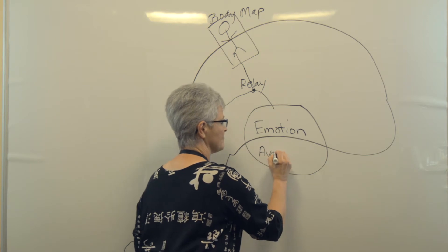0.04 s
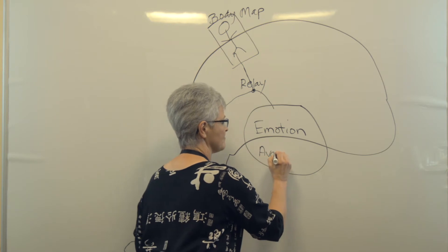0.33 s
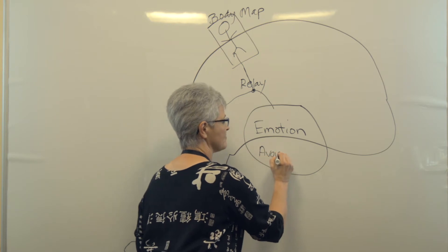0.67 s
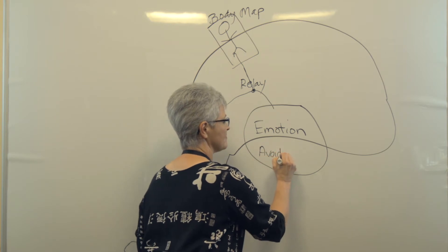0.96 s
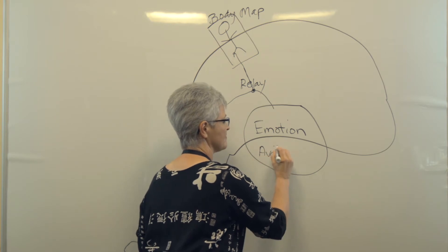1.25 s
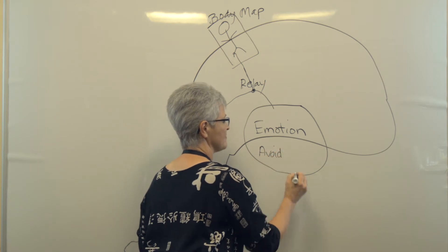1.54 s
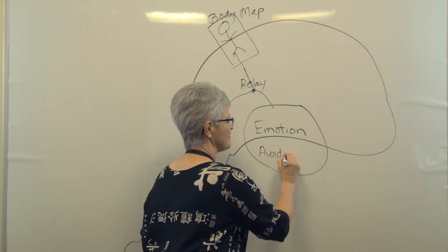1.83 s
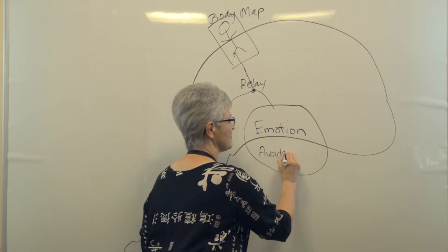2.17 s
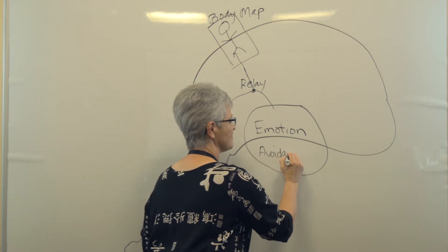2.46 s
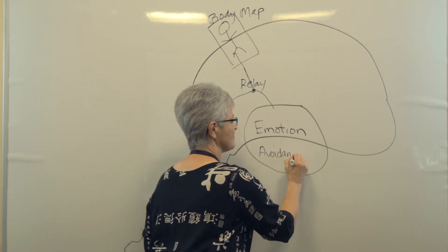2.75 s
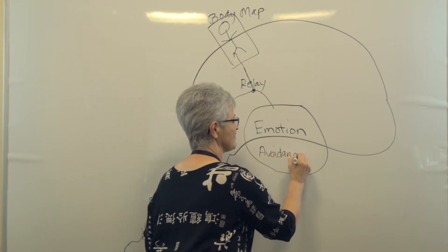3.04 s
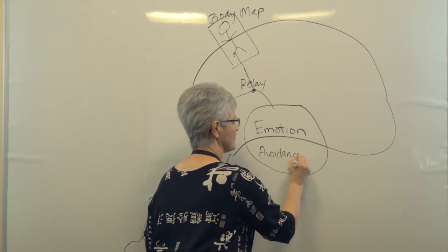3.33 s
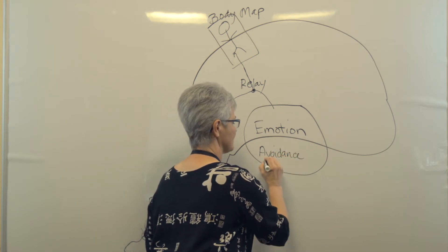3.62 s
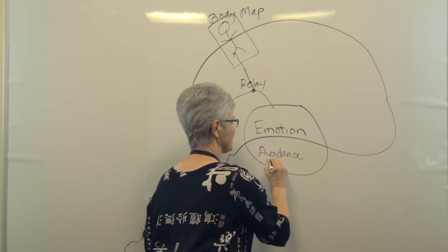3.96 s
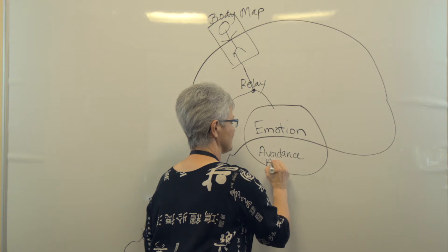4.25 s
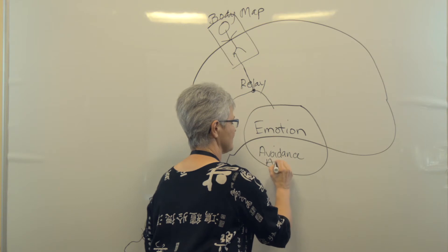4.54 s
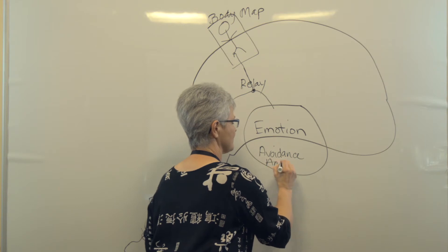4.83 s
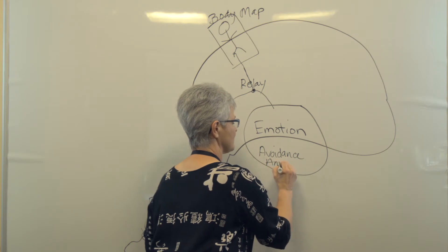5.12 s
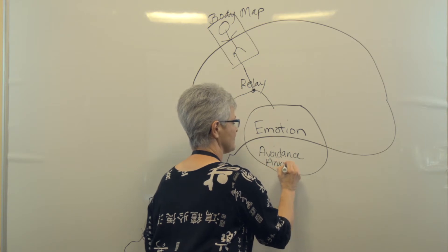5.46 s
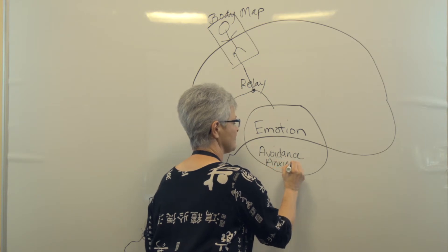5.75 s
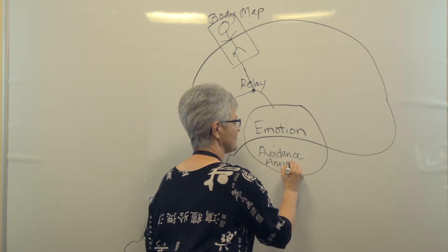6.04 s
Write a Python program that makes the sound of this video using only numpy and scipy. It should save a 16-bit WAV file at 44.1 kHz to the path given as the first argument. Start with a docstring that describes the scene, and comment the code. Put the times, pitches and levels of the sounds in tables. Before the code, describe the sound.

Over the low rush and hum of classroom ventilation, a marker taps and slides across a whiteboard close to the microphone. Irregular soft knocks ring briefly in the panel and the room, with faint hissing strokes between them. One loud knock stands out early. The writing goes on, ending with a sharp plastic click and a few short, faint squeaks.

```python
"""Writing on a whiteboard

A felt marker writes on a wall-mounted whiteboard in a quiet, ventilated classroom. Each letter starts
with a dull knock of the tip on the panel, then the felt hisses along the stroke. One dot is struck
hard. The marker ticks as it catches or lifts, and its tip sticks and slips in a few rough squeaks,
mostly near the end, where hard plastic also clicks sharply."""
import sys
import numpy as np
from scipy import signal
from scipy.fft import rfft, irfft, next_fast_len
from scipy.io import wavfile
from scipy.ndimage import map_coordinates

SR = 44100
rng = np.random.default_rng(int(sys.argv[2]) if len(sys.argv) > 2 else 0)


def transcribe(signal):
    """Save signal, clipped to [-1, 1], as a 16-bit WAV file at the path in sys.argv[1]."""
    frames = np.atleast_2d(signal).T
    limited = np.clip(frames, -1, 1)
    pcm = np.round(limited * 32767).astype(np.int16)
    wavfile.write(sys.argv[1], SR, pcm)


N = 277300

# The tip lands and is pulled down the board: t/s, knock level/dB,
# hardness (over 1 on the point, under 1 on the side), hiss level/dB
LANDINGS = [(0.3003, -22, 1.06, -69.5), (.526, -22, 0.96, -70.5), (0.8283, -23, 1.4, -76),
            (1.1469, -6.5, 0.97, -90), (1.852, -23, 1.06, -78), (2.3253, -28.5, 1.13, -76),
            (2.747, -38, 0.87, -74), (3.6529, -18, 1.1, -71), (4.1065, -19, 0.95, -63),
            (4.7789, -21.5, 0.95, -68), (4.983, -24.5, 1.06, -67), (5.214, -23, 0.99, -71),
            (5.4107, -26, 0.82, -68), (5.7525, -23.5, 1.06, -64.5), (5.9822, -17.5, 0.95, -61.5)]
# The ringing of the marker's body, its barrel: f/Hz, width/Hz, level/dB
BARREL_MODES = [(970, 530, -2.5), (1536, 295, 1.5), (1753, 220, 0.5)]


def amp(db):
    """Turn decibels into a gain."""
    return 10 ** (np.asarray(db) / 20)


def unit(x):
    """Scale x to an average power of 1."""
    return x / np.sqrt(np.mean(x ** 2) + 1e-20)


def along(points, hz):
    """Read a curve of (f/Hz, value) points on a log frequency axis."""
    f, values = np.transpose(points)
    return np.interp(np.log(hz + 1), np.log(f + 1), values)


def add(track, s, x):
    """Mix x into the track from s seconds on."""
    start = max(round(s * SR), 0)
    part = track[start:start + len(x)]
    part += x[:len(part)]


def wobble(rate):
    """A smooth curve through `rate` random values a second."""
    values = rng.standard_normal(int(N * rate / SR) + 4)
    return map_coordinates(values, [np.arange(N) * rate / SR])


def filtered(x, response):
    """Scale each frequency f in x by response(f)."""
    size = next_fast_len(len(x) + SR // 4)
    return irfft(rfft(x, size) * response(np.fft.rfftfreq(size, 1 / SR)), size)[:len(x)]


def resonances(modes, f):
    """How a body that rings at these modes (f/Hz, width/Hz, level/dB) responds at f."""
    return sum((-1) ** k * amp(db) * 1j * f * width / (hz * hz - f * f + 1j * f * width)
               for k, (hz, width, db) in enumerate(modes))


def impulse(gain, size=4096):
    """A sudden pulse of peak 1 whose tone colour is gain(f)."""
    cepstrum = irfft(np.log(np.maximum(gain(np.fft.rfftfreq(size, 1 / SR)), 1e-6)))
    cepstrum[1:size // 2] *= 2  # folding it moves the energy to the pulse's start
    cepstrum[size // 2 + 1:] = 0
    pulse = irfft(np.exp(rfft(cepstrum)))
    return pulse / np.abs(pulse).max()


def swell(length, response):
    """Filtered noise that rises and falls, like the speed of a stroke."""
    n = max(int(length * SR), 2)
    return unit(filtered(rng.standard_normal(n), response)) * np.sin(np.linspace(0, np.pi, n))


def room_tail(build_s=0.00067):
    """The room's many echoes blur into fading noise; the bass lasts longest."""
    # How long the room rings: f/Hz, time to fade by 60 dB/s
    fade_times = [(100, 0.88), (300, 0.58), (1000, 0.56), (2000, 0.56), (4000, 0.46), (10000, 0.52)]
    hz, t, spectrum = signal.stft(rng.standard_normal(SR), SR, nperseg=256)
    fade = amp(-60 * t / along(fade_times, hz)[:, None])
    tail = signal.istft(spectrum * fade, SR)[1][:SR]
    tail *= 1 - np.exp(-np.arange(SR) / SR / build_s)
    return tail / np.linalg.norm(tail)


def in_room(x, wet_db):
    """A sound plus the room's echoes at wet_db."""
    return x + amp(wet_db) * signal.fftconvolve(x, room_tail())[:N]


def ventilation(air_db=-51, hum_db=-1):
    """Moving air makes a low rush with slightly unsteady tones in it."""
    # Ventilation rush and faint microphone hiss: f/Hz, relative level/dB
    air_spectrum = [(12, -47), (20, -16.5), (65, -3), (88, -3), (101, -20.5), (123, -3.5), (158, -4),
                    (198, -4), (301, -8), (388, -17), (624, -21.5), (825, -26.5), (897, -23), (1370, -34.5),
                    (16000, -45.5)]
    # The ventilation's hum: f/Hz, relative level/dB
    hum_tones = [(59, -64), (76.8, -61), (133, -60), (201, -63)]
    t = np.arange(N) / SR
    rush = unit(filtered(rng.standard_normal(N), lambda f: amp(along(air_spectrum, f))))
    hum = np.zeros(N)
    for hz, db in hum_tones:
        peak = np.sqrt(2) * amp(db + 0.92 * wobble(1.9))
        hum += peak * np.sin(2 * np.pi * hz * t + 1.76 * wobble(6))
    return amp(air_db) * rush + amp(hum_db) * hum


def barrel_ticks(cutoff_hz=1700):
    """Light contacts ring only the marker's body."""
    # The marker catches or lifts: t/s, peak level/dB
    touches = [(0.473, -46.5), (3.047, -46), (4.4082, -39.5), (5.425, -43)]
    out = np.zeros(N)
    ring = impulse(lambda f: np.abs(resonances(BARREL_MODES, f)) / (1 + (f / cutoff_hz) ** 4))
    for s, db in touches:
        add(out, s, amp(db) * ring)
    return in_room(out, wet_db=-3)


def tip_squeaks(relative_width=0.2):
    """The tip sticks and slips too briefly to settle on a clean pitch."""
    # The tip chatters: middle t/s, length/s, level/dB, f/Hz
    chatters = [(3.133, .027, -57.5, 1670), (5.442, .025, -63.5, 1670), (6.085, .035, -67, 4200),
                (6.091, .036, -52, 2550), (6.228, 0.019, -52, 2420), (6.244, 0.0085, -42.5, 2910),
                (6.254, .012, -49, 2050)]
    out = np.zeros(N)
    for s, length, db, hz in chatters:
        squeak = swell(length, lambda f: resonances([(hz, relative_width * hz, 0)], f) ** 2)
        add(out, s - length / 2, amp(db) * squeak)
    return in_room(out, wet_db=-17)


def plastic_clicks(corner_hz=12000, scatter_s=0.06):
    """Small hard contacts ring the plastic, and nearby surfaces briefly scatter the sound."""
    # Plastic contacts close by: t/s, peak level/dB, treble tilt/(dB per octave)
    contacts = [(6.184, -33, 29), (6.1888, -41, -4), (6.2094, -24.5, -3), (6.2119, -14, 0),
                (6.242, -36.5, -10)]
    # The plastic's ringing: f/Hz, width/Hz, level/dB
    plastic_modes = [(1370, 860, -7), (2510, 260, -2), (5800, 590, 3.5), (6950, 240, 5.5),
                     (8060, 350, -1.5), (10530, 460, 1), (11900, 500, -2)]
    out, t = np.zeros(N), np.arange(SR // 10) / SR
    for s, db, tilt in contacts:
        top_hz = corner_hz * 2 ** (tilt / 20)  # a shorter contact reaches higher
        slope = lambda f: amp(tilt * np.log2(np.maximum(f, 1000) / 1000))
        colour = lambda f: slope(f) / np.hypot(1, (f / top_hz) ** 7)
        add(out, s, amp(db) * impulse(lambda f: np.abs(resonances(plastic_modes, f)) * colour(f)))
    scatter = rng.standard_normal(len(t)) * amp(-60 * t / scatter_s)
    out += amp(-14) * signal.fftconvolve(out, scatter / np.linalg.norm(scatter))[:N]
    return in_room(out, wet_db=-23)


def felt_strokes(grip_db=2.5, grain_db=2.5, pull_delay_s=0.058, pull_s=0.09):
    """Felt fibres catch, hiss and shake the barrel; the tip's angle boosts a band that slides."""
    # The tip stays down and sweeps on through the letter: middle t/s, length/s, level/dB
    sweeps = [(.65, .16, -67.5), (.925, 0.1, -66), (2.03, 0.19, -72), (2.19, 0.068, -72.5),
              (2.48, 0.065, -71), (2.615, 0.1, -70), (2.935, 0.25, -66.5), (3.135, .145, -60.5),
              (3.805, .07, -71), (3.945, 0.13, -69), (4.34, .08, -70.5), (4.44, 0.098, -71),
              (4.57, 0.093, -71), (5.61, 0.14, -62.5), (6.25, 0.19, -61.5)]
    # Felt hissing on the glossy board: f/Hz, relative level/dB
    felt_spectrum = [(1500, -22), (2800, -20), (3950, -0.5), (4300, -9.5), (4700, -4.5), (5200, -10.5),
                     (6050, 1), (7300, -1), (8250, -2.5), (9000, 2), (10500, -7.5), (11500, -7.5),
                     (13200, -17), (16000, -34)]
    # How much the barrel sounds along: t/s, level relative to the hiss/dB
    rub_levels = [(1, -8), (2.9, -2.5), (3.2, -10), (4.2, -7), (5.85, -9), (6.05, 1), (6.25, 3.5)]
    band_hz, band_db, width_octaves, spread_octaves = 7340, 6, 0.068, 0.2

    def hiss_colour(centre_hz):
        boost = lambda f: band_db * np.exp(-0.5 * (np.log2((f + 1) / centre_hz) / width_octaves) ** 2)
        return lambda f: amp(along(felt_spectrum, f) + boost(f))

    hiss, barrel = np.zeros(N), np.zeros(N)
    moves = [(s + pull_delay_s, pull_s, db) for s, _, _, db in LANDINGS] + list(sweeps)
    for (s, length, db), (direction, angle) in zip(moves, rng.standard_normal((len(moves), 2))):
        centre_hz = band_hz * 2 ** (spread_octaves * angle)
        slide = np.exp(0.07 * direction)  # the band shifts as the hand moves
        early = swell(length, hiss_colour(centre_hz / slide))
        late = swell(length, hiss_colour(centre_hz * slide))
        blend = np.linspace(0, np.pi / 2, len(early))
        add(hiss, s - length / 2, amp(db) * (early * np.cos(blend) + late * np.sin(blend)))
        rub_db = db + np.interp(s, *np.transpose(rub_levels))
        rub = swell(length, lambda f: resonances(BARREL_MODES, f) ** 2)
        add(barrel, s - length / 2, amp(rub_db) * rub)
    barrel *= amp(grip_db * wobble(50))  # the grip on the board comes and goes
    return in_room((hiss + barrel) * amp(grain_db * wobble(500)), wet_db=-10.5)


def panel_knocks(ring_db=-33, wet_db=-3, tail_change=0.36, steepness=3.5, rebound=0.31):
    """The tip pushes the panel, which rings on; the room answers almost alike each time."""
    # The panel's push on the air: f/Hz, relative level/dB
    push_spectrum = [(30, -46), (60, -16.5), (110, 4), (200, 2), (350, 4.5), (550, 0.5), (750, -1),
                     (1100, -1.5), (1450, -9.5), (1850, -2), (2600, -4.5), (4200, 2.5), (8000, 14.5),
                     (15000, 15)]
    # The panel's ringing: f/Hz, relative level/dB, time to fade by 60 dB/s
    panel_modes = [(74.4, -18, 0.76), (239.5, -19, 0.62), (347, -33, 0.62), (356, -21, 0.29),
                   (426, -20, 0.48), (496, -28.5, 0.38), (574, -38.5, 0.36), (639, -25, 0.32),
                   (729, -27.5, 0.5), (870.4, -16.5, 0.15), (900, -28.5, 0.43), (1125, -32, 0.37)]
    # The panel's sound sent into the room: f/Hz, relative level/dB
    sent_spectrum = [(120, -2), (300, 0), (480, -3), (750, -7.5), (1200, -8), (2500, -5), (6000, -8.5)]
    # Early echoes from the frame, the writer and the floor: delay/s, relative level/dB
    echoes = [(.0083, -14), (.0116, -11.5), (.0165, -20), (.0338, -22)]
    soft_hz, stiffen_hz = 326, 1690  # the felt stiffens under a stronger blow
    out, t, usual_tail = np.zeros(N), np.arange(SR) / SR, room_tail()
    dull_echo = signal.lfilter([0.15], [1, -0.85], signal.unit_impulse(64))
    for s, db, hardness, _ in LANDINGS:
        top_hz = hardness * (soft_hz + stiffen_hz * amp(db))
        # a soft contact lasts longer and lacks treble; a hard one rebounds and lacks bass
        contact = lambda f: f / np.hypot(f, rebound * top_hz) / np.hypot(1, (f / top_hz) ** steepness)
        push = -impulse(lambda f: amp(along(push_spectrum, f)) * contact(f + 1))
        ring = sum(amp(level + rng.normal(0, 1) - 60 * t / fade_s) * np.cos(2 * np.pi * hz * t)
                   for hz, level, fade_s in panel_modes)
        tail = (usual_tail + tail_change * room_tail()) / np.hypot(1, tail_change)
        tail = filtered(tail, lambda f: amp(along(sent_spectrum, f)))
        answer = amp(ring_db) * ring + amp(wet_db) * tail
        answer[0] += 1  # the direct sound
        for delay, level in echoes:
            add(answer, delay, amp(level) * dull_echo)
        add(out, s, amp(db) * signal.fftconvolve(push, answer))
    return out


def scene():
    """Everything as heard near the writer, in one channel."""
    writing = panel_knocks() + felt_strokes() + barrel_ticks() + tip_squeaks() + plastic_clicks()
    return (writing + ventilation())[None]


def record(dry, top_hz=15900):
    """Cut off the very highest treble."""
    return np.array([filtered(x, lambda f: f < top_hz) for x in dry])


dry = scene()
out = record(dry)
transcribe(out)
```